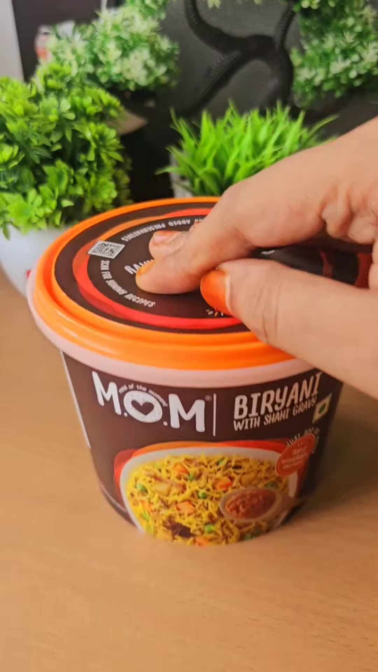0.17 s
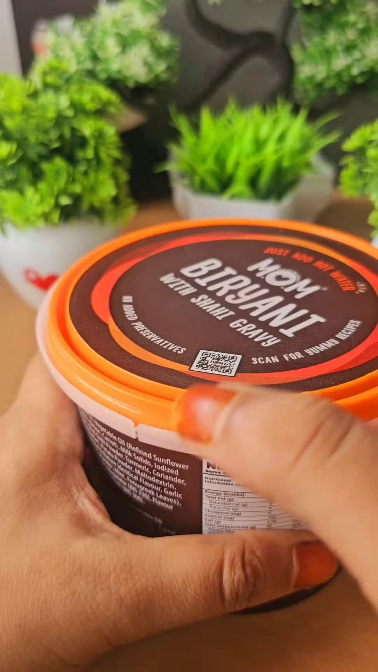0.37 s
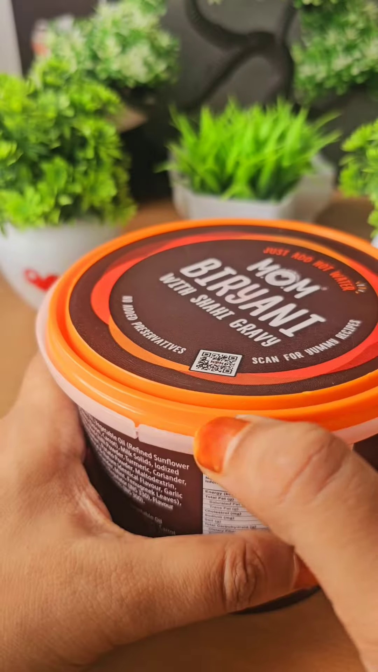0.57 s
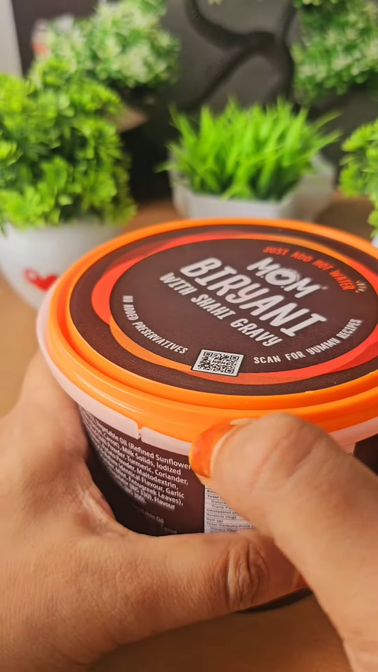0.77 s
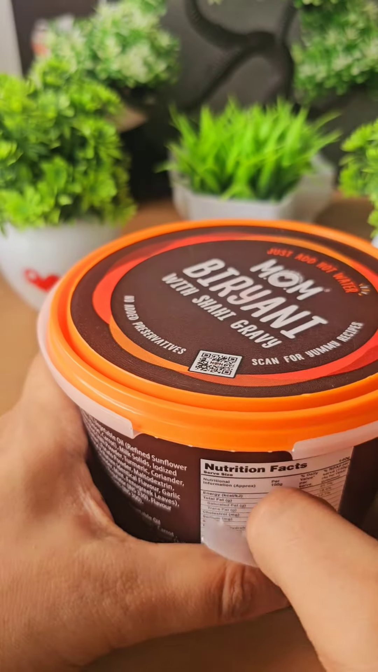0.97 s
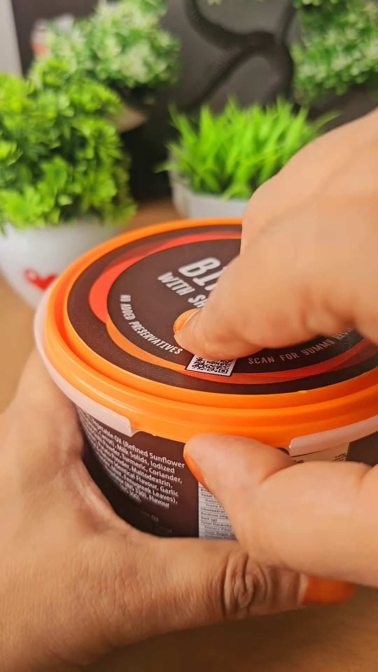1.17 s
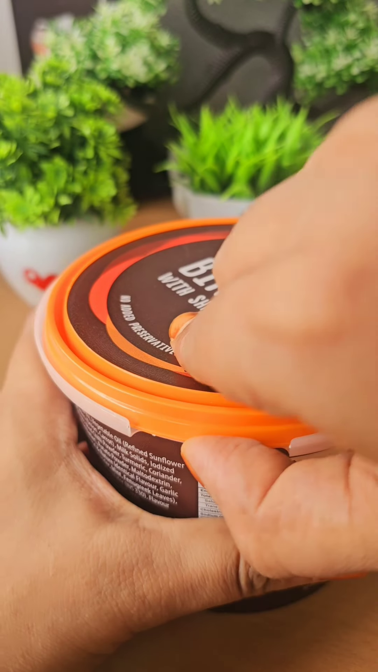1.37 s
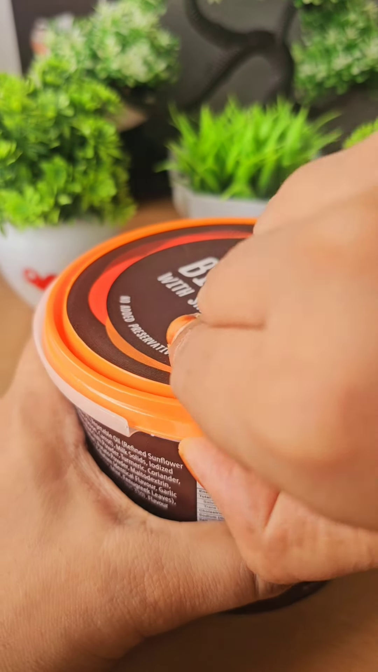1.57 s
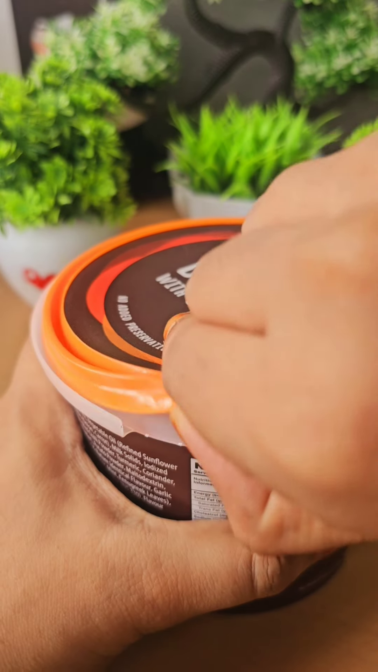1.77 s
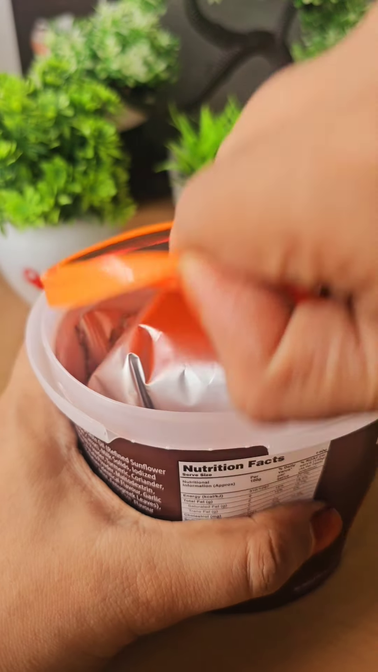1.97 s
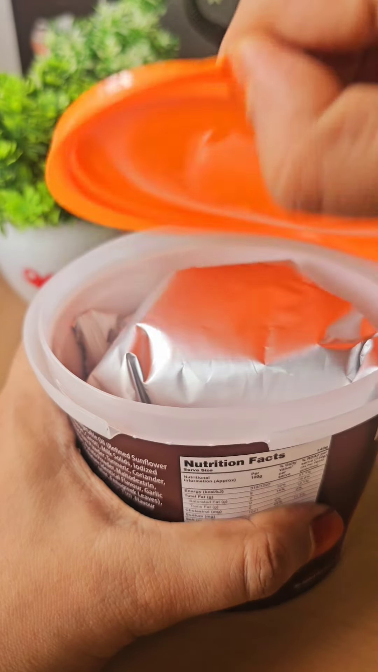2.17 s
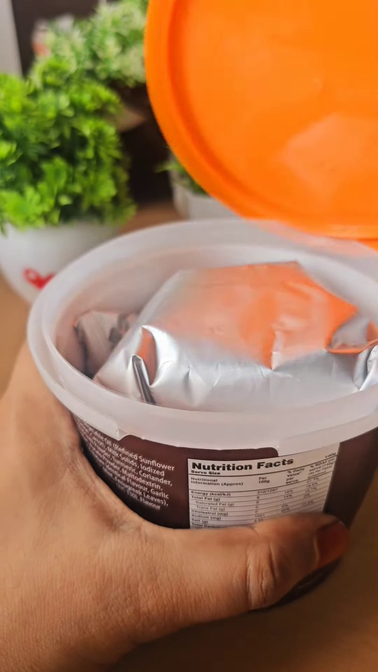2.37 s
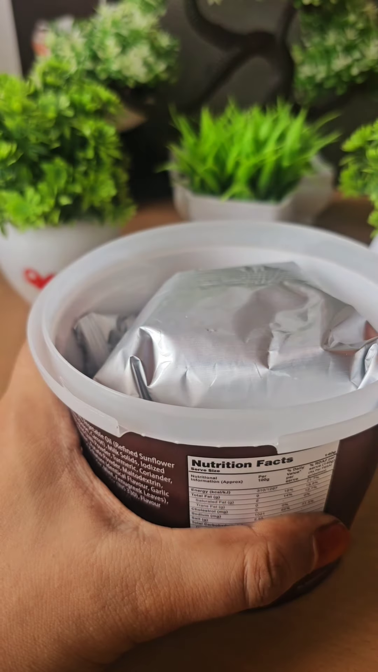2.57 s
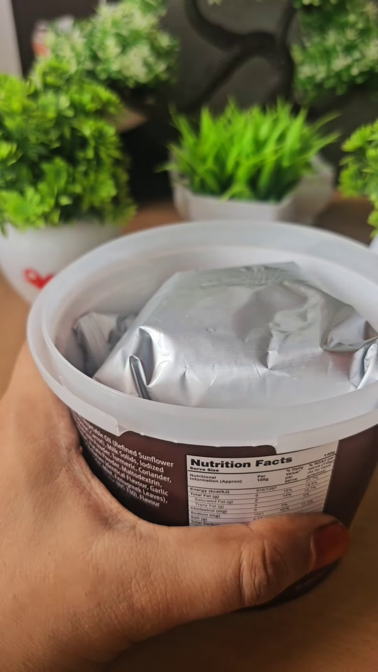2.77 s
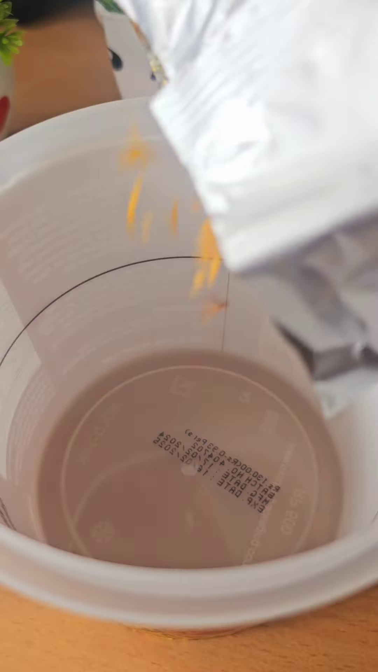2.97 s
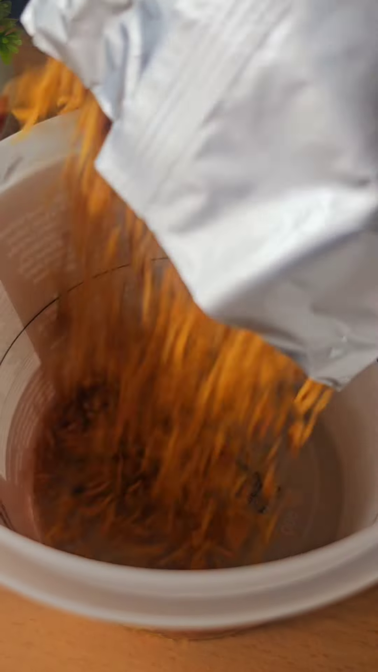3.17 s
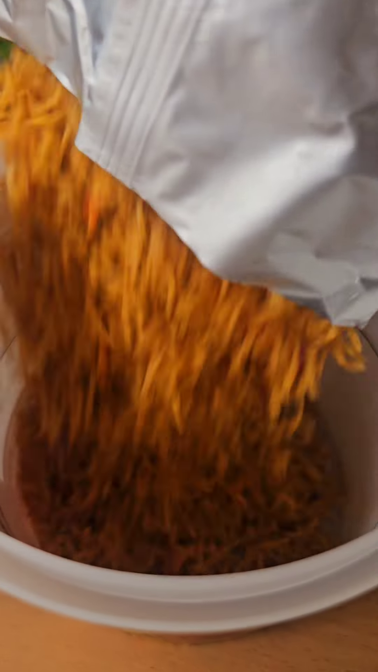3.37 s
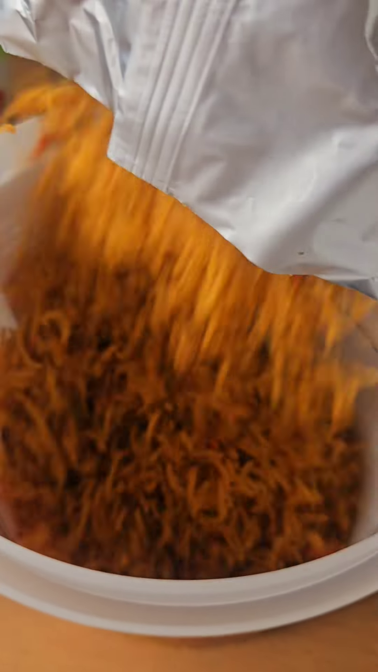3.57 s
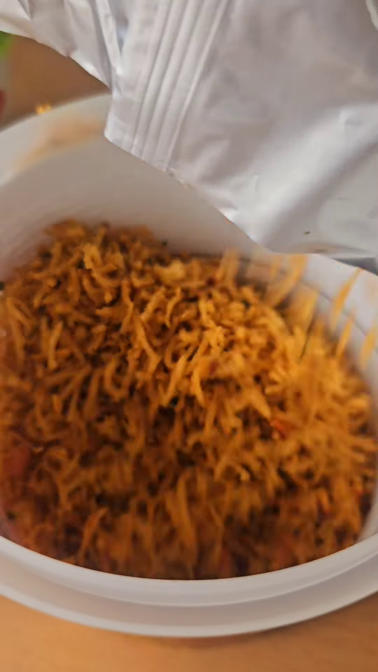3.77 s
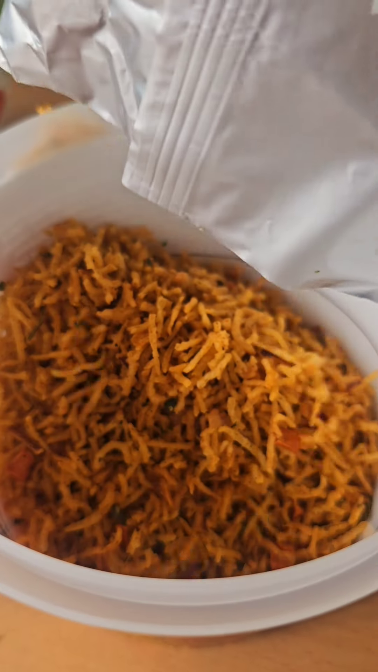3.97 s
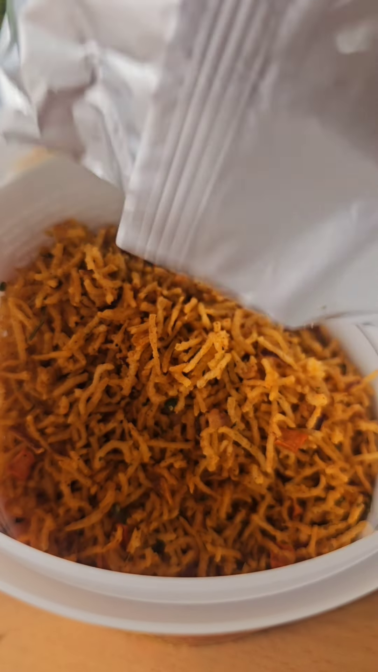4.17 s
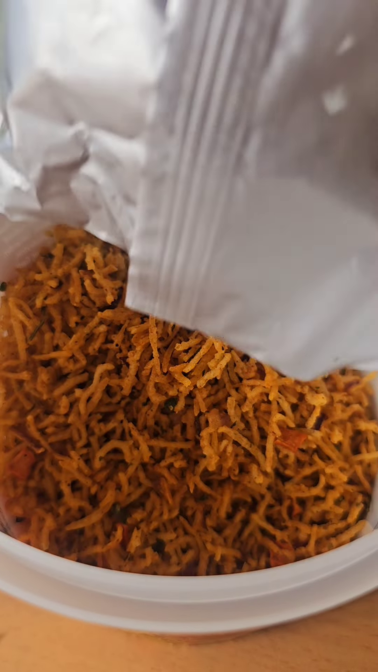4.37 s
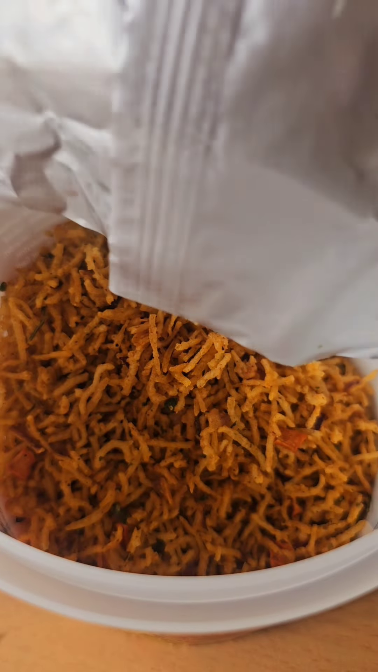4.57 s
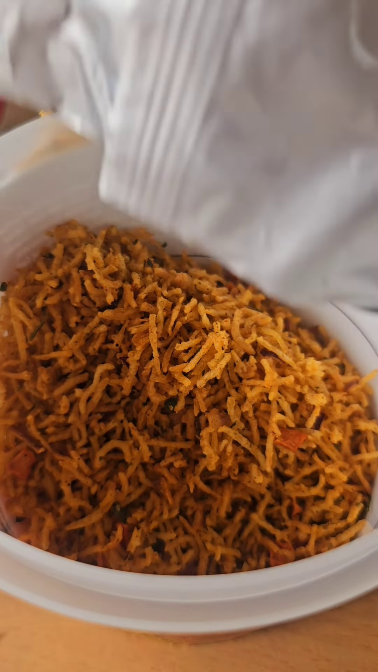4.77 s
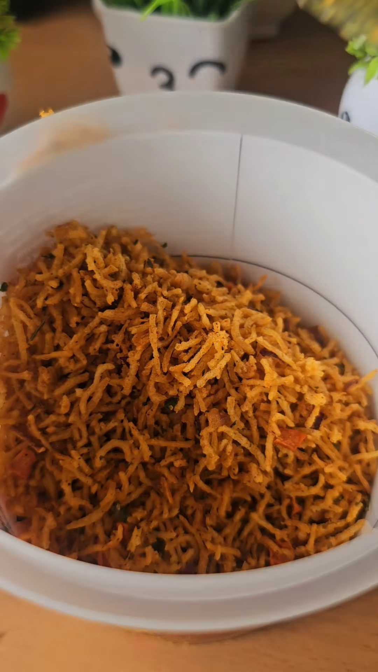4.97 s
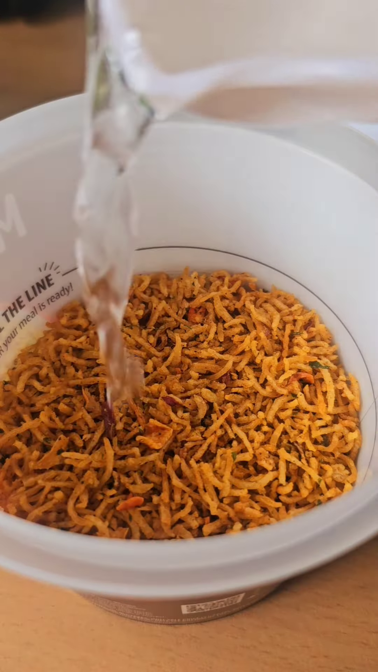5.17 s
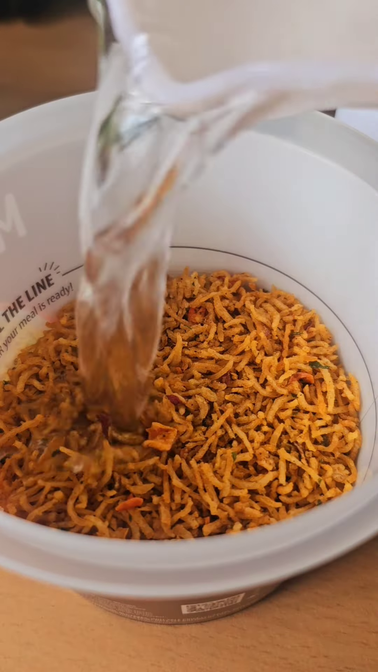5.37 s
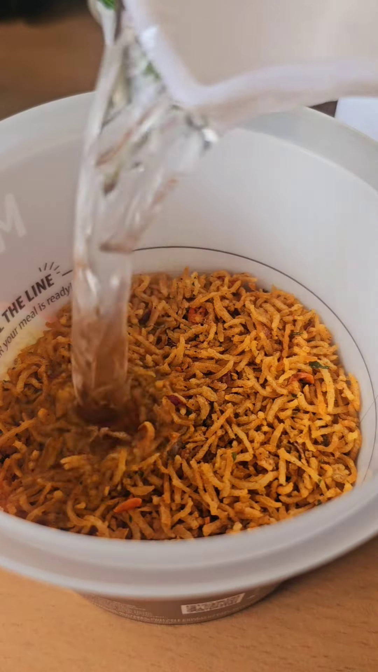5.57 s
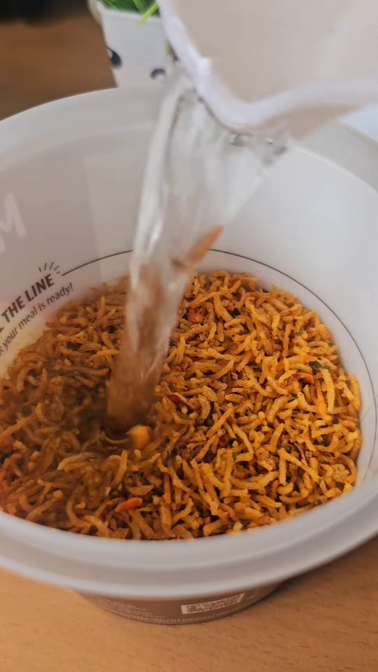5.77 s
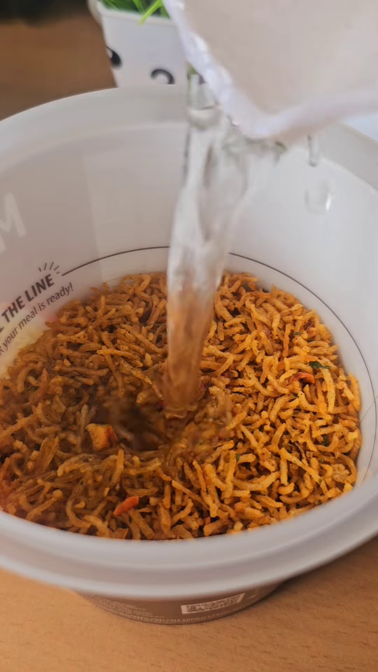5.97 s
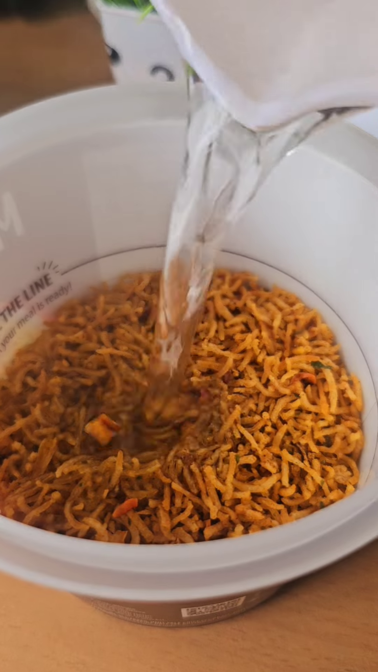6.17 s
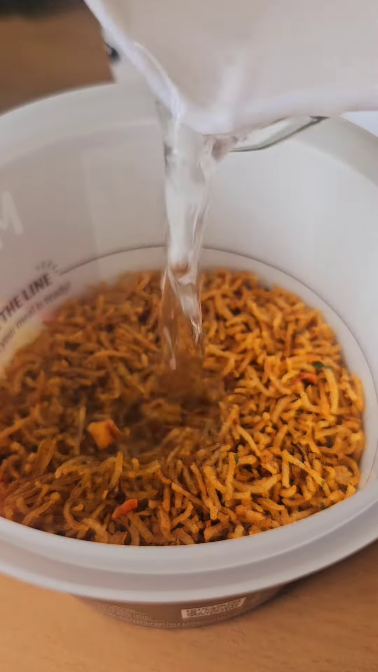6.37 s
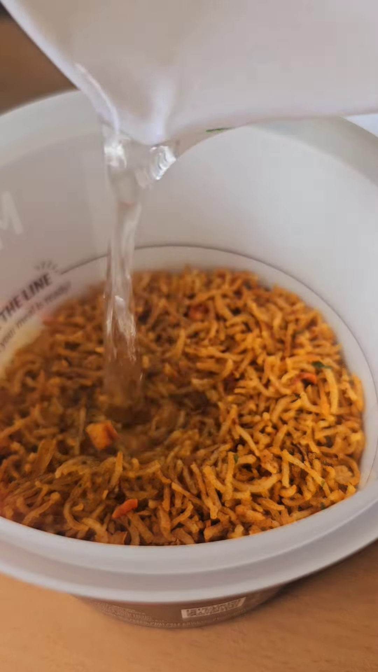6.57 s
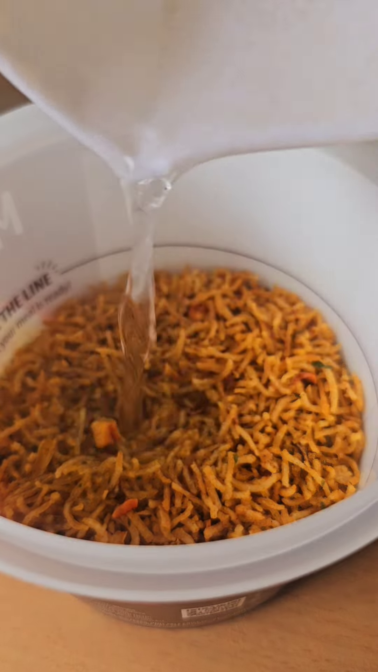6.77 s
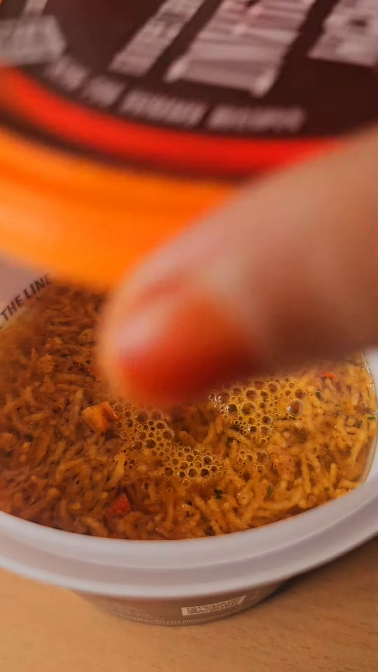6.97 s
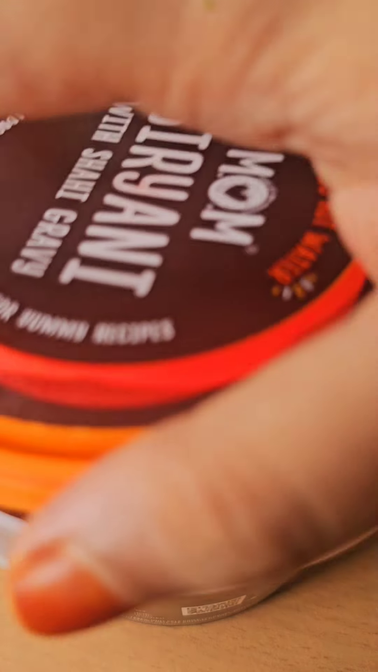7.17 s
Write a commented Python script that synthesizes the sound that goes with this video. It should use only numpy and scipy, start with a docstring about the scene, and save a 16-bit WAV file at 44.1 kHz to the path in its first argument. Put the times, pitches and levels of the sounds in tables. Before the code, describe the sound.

A small, slightly echoing room with low rumble and a distant machine drone, recorded close in stereo. From 0 s a faint rub of fingers on plastic, with tiny ticks until 0.75. At 0.8 a sharp, very loud double snap of a plastic tab, with a low table thump. Soft taps from 1.3, a duller knock at 1.75, a squeaky scrape and click around 1.9-2, then a strong hollow lid pop at 2.35. Near quiet until 2.95, when dry rice starts; hard ticks at 3.02 lead into a bright, dense rush peaking at 3.1-3.2, thinning through 3.7 and ending in stray ticks by 3.95. Foil rustle and a cluster of light knocks at 4.1-4.35. A barely audible high bird whistle at 4.55-5. From 5.15 to 6.9, quiet fine crackle with crisp pops and small bubbles, brighter and busier after 6.25. A light plastic touch at 7.2.

```python
"""Small room, plastic cup on a table: its tab snaps off and the lid pops free, dry rice rushes from a foil
pouch into it, hot water crackles into the rice, the lid touches down. A far bird whistles once over rumble.
Knocks drive cup resonances; rubbing, rice and water are coloured grain noise, with separate rice ticks and
pops; table booms are swelling sines; rumble is filtered noise. Decaying noise gives the echo."""
import sys
import numpy as np
from scipy import signal
from scipy.fft import rfft, irfft
from scipy.io import wavfile

SR = 44100
rng = np.random.default_rng(int(sys.argv[2]) if len(sys.argv) > 2 else 0)


def transcribe(signal):
    """Save signal, clipped to [-1, 1], as a 16-bit WAV file at the path in sys.argv[1]."""
    frames = np.atleast_2d(signal).T
    limited = np.clip(frames, -1, 1)
    pcm = np.round(limited * 32767).astype(np.int16)
    wavfile.write(sys.argv[1], SR, pcm)


N = 318402
TIME = np.arange(N) / SR
EDGES_HZ = 22 * 2 ** np.arange(0, 9.8, .4)   # filter-bank edges

# room rumble before waver: t/s, low level/dB, low-middle level/dB
RUMBLE = [(0.0, -54.5, -62), (0.8, -53.5, -61), (1.25, -60, -66), (1.9, -58.5, -55), (2.85, -59, -64.5),
          (3.1, -60, -59.5), (3.5, -48.5, -58), (3.85, -60, -63.5), (4.16, -54.5, -59.5), (4.85, -59, -64),
          (5.1, -54, -55.5), (6.75, -52.5, -56), (6.92, -49, -54.5), (7.22, -47.5, -55.5)]
# room spectra, earlier and later: f/Hz, relative density/dB
ROOM_EARLY = [(13, -32), (22, -13.5), (128, -5.5), (328, -12.5), (376, -28), (585, -21), (672, -32.5),
              (730, -22), (935, -40), (1380, -33), (3230, -42), (5310, -49), (5930, -35.5), (6810, -52.5),
              (16000, -51)]
ROOM_LATE = [(13, -54), (22, -77), (49, 8), (70, -2), (90, -6.5), (125, 3.5), (156, -19), (189, -9),
             (444, -16.5), (554, -35), (690, -36), (1540, -45), (1860, -52), (3150, -54), (16000, -66.5)]
# far machinery drone, earlier and later: f/Hz, width/Hz, level re low rumble/dB
DRONE_EARLY = [(61.5, 4.2, -8.5), (102.43, 3, -1.5), (194, 9.8, -17), (288.6, 15, -15)]
DRONE_LATE = [(54.8, 2.6, -7.5), (129.4, 2.7, 0.5), (222, 2.3, -14), (255, 8, -8.5), (331.4, 3.7, -12.5)]
# left-right correlation of the room: f/Hz, correlation/1
ROOM_CORRELATION = [(60, 0.96), (180, 0.87), (550, 0.7), (1650, 0.06), (4970, 0.02), (15000, 0.02)]
# left-right correlation of a wide near source: f/Hz, correlation/1
NEAR_CORRELATION = [(100, 0.61), (600, 0.8), (1500, 0.15), (3000, 0.18), (6000, 0.033), (15000, 0.13)]
# left-right tilt at full share, before the common offset: f/Hz, level difference/dB
TILT = [(60, 3.5), (130, 7.5), (290, 4), (640, -3.5), (1410, 10), (3100, 10), (6820, 8.5), (15000, 12)]
# source placement: t/s, left lag/samples, tilt share/1, echo level/dB
PLACEMENT = [(0, 4, 0.14, -3.5), (2.945, 5, 0.56, -14), (2.95, -17.5, 0.7, -10), (7.22, -15.5, 0.96, -9.5)]
# brief level dips: t/s, silent length/s
DIPS = [(0.314, 0.0058), (1.17, 0.0024), (1.175, 0.0059), (2.947, 0.0058), (6.891, 0.0022)]
# late table booms under a heavy jerk: t/s, f/Hz, level before swell and decay/dB, swell/ms, t60/s
BOOMS = [(0.814, 82, -16.5, 19, 0.22), (1.744, 89.1, -36, 35, 0.55), (2.335, 81.8, -22, 25, 0.17),
         (4.127, 97.6, -26, 15, 0.13)]
# strokes of hands, lid and pouch: t/s, held/s, level/dB, treble level/dB
RUB = [(0.0, 0.13, -50, -56.5), (0.385, 0.039, -65.5, -78), (0.5, 0.054, -69.5, -77),
       (1.198, 0.01, -65.5, -68), (1.32, 0.0078, -69, -79), (1.405, 0.0069, -87, -91),
       (1.52, 0.013, -69, -72.5), (1.6, 0.093, -74, -78.5), (1.765, .02, -54.5, -58),
       (1.909, 0.044, -52, -62), (2.05, 0.12, -65.5, -75.5), (2.905, .04, -62, -87),
       (3.929, 0.0089, -76, -61), (4.124, 0.08, -53.5, -62), (4.338, 0.013, -60, -58),
       (4.45, .25, -79, -80), (4.794, 0.0037, -68.5, -82), (4.9, .1, -81.5, -82.5)]
# rubbing spectrum: f/Hz, relative density/dB
RUB_COLOUR = [(150, -42.5), (250, -2.5), (287, -4.5), (460, 0.5), (528, -13), (607, -3.5), (971, -10.5),
              (1330, -2.5), (2570, -18.5), (3520, -14.5), (4410, -20.5), (16000, -32.5)]
# soaking crackle: t/s, level/dB
WATER = [(5.149, -73.5), (5.452, -73), (5.73, -66.5), (6.3, -69.5), (6.45, -64.5), (6.73, -73),
         (6.881, -70.5)]
# crackle spectrum: f/Hz, relative density/dB
WATER_COLOUR = [(710, -30.5), (1200, 1), (1790, -23.5), (2270, -6.5), (2590, -11), (4750, -10), (7820, -8),
                (8820, 2.5), (16000, -2.5)]
# louder pops and bubbles: t/s, ring onset level/dB, f/Hz
POPS = [(5.24, -55.5, 6260), (5.329, -49.5, 11400), (5.387, -34.5, 6120), (5.617, -45.5, 2900),
        (5.849, -38, 6630), (5.921, -45, 4100), (5.981, -48, 1326), (6.07, -44.5, 14100),
        (6.232, -43, 6460), (6.254, -51, 1290), (6.332, -31, 8920), (6.376, -48, 1240),
        (6.402, -36.5, 4450), (6.421, -42, 2320), (6.422, -46, 1084), (6.499, -39.5, 4945),
        (6.521, -54, 1310), (6.655, -49, 13400), (6.817, -40, 13400)]
# rice flow before clumping: t/s, level/dB
RICE = [(2.95, -50.5), (2.966, -37.5), (3.02, -43.5), (3.035, -32), (3.124, -21), (3.2, -24.5),
        (3.264, -30), (3.522, -30.5), (3.646, -34), (3.706, -32.5), (3.8, -44.5), (3.88, -58), (3.96, -72)]
# rice spectrum: f/Hz, relative density/dB
RICE_COLOUR = [(88, -45), (150, -27.5), (431, -14), (514, -2.5), (702, -4), (805, -1.5), (998, -8.5),
               (1500, -2), (1870, -4.5), (5460, -1.5), (6020, -3.5), (11700, -15), (16000, -14.5)]
# air and wall resonances of the open cup: f/Hz, width/Hz, level re its part/dB
HOLLOWS = [(546, 220, -12.5), (800.5, 55, -7), (1440, 98, -6), (2030, 190, -16), (4130, 300, -13),
           (5400, 220, -7), (11400, 290, -9)]
# single grains that stand out: t/s, level/dB
GRAINS = [(2.952, -38.5), (2.961, -53), (2.982, -38), (3.022, -15), (3.039, -17.5), (3.058, -30),
          (3.077, -26), (3.677, -24), (3.698, -26), (3.731, -32), (3.775, -49), (3.786, -29),
          (3.821, -23.5), (3.844, -41), (3.86, -35), (3.891, -38.5), (3.935, -42)]
# grain blow on bare cup and on heap: thump, body, wall, crack level re the grain/dB
GRAIN_BARE_DB = [-36.5, -17, -3.5, 4.1]
GRAIN_HEAP_DB = [-39, -25, -12, -1.7]
# snaps, pops, taps: t/s, thump/dB, body/dB, wall/dB, crack/dB, left-right/dB, contact decay/ms
KNOCKS = [(0.32, -47.5, -56.5, -57, -61, 4, 0.72), (0.402, -53.5, -69, -52.5, -61, 11, 4.7),
          (0.715, -55.5, -59, -64, -57, 0, 4), (0.734, -59.5, -70.5, -80, -60, 6, 3),
          (0.804, -45, -48, -3, -30, -8, 0.67), (0.807, -44, -48.5, 0.5, -31, 3, 0.84),
          (0.813, -24, -33.5, -9, -14.5, 2.5, 1.23), (1.313, -49, -62.5, -66, -54.5, 0, 1.7),
          (1.329, -52, -50, -69, -61, -2, 1.6), (1.404, -46, -50.5, -48.5, -91, -2.5, 1.1),
          (1.434, -53, -41, -79, -85, -2, 1.5), (1.682, -45, -53, -49, -59, -2, 1.5),
          (1.742, -33.5, -31.5, -28, -54, -6, 1.5), (1.76, -32.5, -47, -69, -51.5, -1, 1.4),
          (1.881, -40, -41.5, -77, -62.5, -2.5, 2.5), (1.955, -37, -28.5, -27, -26.5, 2, 2.04),
          (2.336, -20.5, -14.5, -4, -11.5, -2, 2.14), (3.906, -54, -36.5, -33, -39, 3, 1.9),
          (4.037, -58, -35, -35, -86, 2, 1.9), (4.119, -38.5, -42, -28.5, -61, 1, 1.9),
          (4.128, -38, -30, -29, -50, 0, 4.5), (4.15, -41, -30, -36, -58, 0.5, 2.1),
          (4.163, -47, -37, -49, -54, -2, 1.7), (4.173, -50, -49, -38, -50, 13, 1.5),
          (4.179, -69, -39, -33, -43, 8, 2.6), (4.19, -65, -43, -35, -47, -2.5, 2.5),
          (4.204, -51.5, -39, -38, -41, 7, 4.6), (4.227, -63, -43, -46, -48, 6, 3.5),
          (4.335, -48, -40.5, -44.5, -40, 1, 6), (4.521, -50, -70, -51.5, -63.5, 0, 1.5),
          (4.888, -54, -67, -62, -80, 1, 1.5), (4.797, -55.5, -42, -54.5, -81, 8.5, 1.47),
          (7.201, -52.5, -37, -34.5, -48.5, -2, 2)]
# where the four knock levels apply: f/Hz
KNOCK_LEVEL_HZ = [100, 600, 2400, 9000]
# cup and lid modes: f/Hz, mean level/dB, t60/s
CUP = [(66, -3.5, 0.15), (94.5, 2, 0.072), (135, -3, 0.096), (200, -2, 0.032), (294, -6, 0.11),
       (466, 5, 0.023), (660, 4, 0.018), (840, 1, 0.024), (1306, 4.5, 0.016), (1750, 4, 0.0046),
       (2197, -3, 0.0078), (2900, -5, 0.016), (3600, 2.5, 0.0054), (4400, 0.5, 0.0096), (5780, -6.5, 0.013)]
# toneless part of a knock: lower f/Hz, upper f/Hz, level/dB, extra level in the echo feed/dB
CRACKS = [(700, 1500, 11.5, 2.5), (1690, 6400, 14.5, 5.5), (4488, 18000, 15.5, -7.5),
          (9150, 18000, 18.5, 10)]

LATE_ROOM_S, RUMBLE_WAVER_DB = 5.01, 1.5
HISS_DB = [-67, -61.5]   # earlier, later room air before panning
ROOM_T60_S, WALL_CUT_HZ, OUTPUT_CUT_HZ = 0.32, 5200, 16400
WHISTLE_S, WHISTLE_TOP_S, WHISTLE_HZ, WHISTLE_SAG_HZ_PER_S2 = [4.55, 5.0], 4.77, 6100, 8500
WHISTLE_START_DB, WHISTLE_FADE_DB_PER_S = -76, 28
RUB_RISE_DB_PER_S, RUB_FALL_DB_PER_S = 598.5, 399.5
SQUEAK_HZ, SQUEAK_WIDTH_HZ, SQUEAK_DB = 3100, 500, -2.5
SQUEAK_BUILDS_S = 0.071   # shorter strokes excite it only in part
CRACKLES_PER_S = 690
WATER_TREBLE_DB, BRIGHTENING_S = [0.1, 5], [6.25, 6.4]   # crackle treble rises between these times
POP_CYCLES, BUBBLE_CYCLES, BUBBLE_BELOW_HZ = 2.6, 6.3, 1700   # cycles per e-fold of decay
SMALL_POPS, SMALL_POP_MEAN_DB, SMALL_POP_HZ = 16, -62, [1226, 5900]
FULL_FLOW_GRAINS_PER_S, SPARSE_BELOW_DB, RICE_TREBLE_DB = 1800, -33, -4   # weaker flow has fewer grains
HOLLOW_DB, BURIED_S = [-3.5, -18], [3.64, 3.753]   # low part before and after the heap covers the wall
HEAP_DB, HEAP_S = [-32.5, -13], [3.15, 3.5]   # heap thud re flow, before the burying fade
GRAIN_SCATTER_DB, GRAIN_CONTACT_MS = 4, 1.34   # left-right spread; contact decay
MODE_SCATTER_DB = 1.5   # uneven sharing of a blow among the modes


def from_db(db):
    """Decibels to gain."""
    return 10 ** (np.asarray(db) / 20)


def in_time(rows, outside=None):
    """Table columns interpolated to every sample."""
    s, *columns = np.transpose(rows)
    return [np.interp(TIME, s, column, outside, outside) for column in columns]


def at_hz(points, hz):
    """Spectrum interpolated on a log-frequency axis."""
    table_hz, values = np.array(points).T
    return np.interp(np.log(hz), np.log(table_hz), values)


def bandpass(x, low_hz, high_hz, order=2):
    """Butterworth band-pass."""
    return signal.sosfilt(signal.butter(order, [low_hz, high_hz], "band", fs=SR, output="sos"), x)


def ring(force, hz, t60_s):
    """Two-pole resonator: a unit click starts a decaying sine of height 1."""
    r, w = from_db(-60 / (t60_s * SR)), 2 * np.pi * hz / SR
    return signal.lfilter([0, np.sin(w)], [1, -2 * r * np.cos(w), r * r], force + 1e-18)


def ring_width(force, hz, width_hz):
    """Resonator set by bandwidth, whose inverse sets the decay time."""
    return ring(force, hz, np.log(1000) / (np.pi * width_hz))


def drift(rate_hz):
    """Slow random curve of standard deviation 1: twice low-passed noise."""
    r = np.exp(-2 * np.pi * rate_hz / SR)
    slow = signal.lfilter([1], [1, -2 * r, r * r], rng.standard_normal(N))
    return slow / np.std(slow)


def coloured(source, spectrum, correlation, low_hz=1900, high_hz=7500):
    """Filter bank shapes white stereo sources into lows, middle and highs, each nominally rms 1."""
    parts, power = np.zeros((3, 2, N)), np.full(3, 1e-20)
    for k, (low, high) in enumerate(zip(EDGES_HZ, EDGES_HZ[1:])):
        hz = np.sqrt(low * high)
        if spectrum[0][0] < hz < spectrum[-1][0]:
            mid, side = bandpass(source[k % 2], low, high)   # adjacent bands use independent sources
            c = np.clip(at_hz(correlation, hz), -1, 1)
            part = int(hz >= low_hz) + int(hz > high_hz)
            gain = from_db(at_hz(spectrum, hz))
            stereo = np.sqrt(.5 + c / 2) * mid + np.sqrt(.5 - c / 2) * side * [[1], [-1]]
            parts[part] += gain * stereo
            power[part] += gain ** 2 * (high - low) * 2 / SR
    return parts / np.sqrt(power)[:, None, None]


def grains(per_s, spread_db, hiss):
    """Random clicks of uneven size mixed with a power share of hiss; rms near 1 at constant rate."""
    shape = (2, 2, N)
    sizes = from_db(spread_db * np.minimum(rng.exponential(1, shape), 5))
    sizes *= np.sign(rng.random(shape) - .5)
    clicks = sizes * (rng.random(shape) < per_s / SR)
    clicks /= np.sqrt(np.mean(sizes ** 2) * per_s / SR)
    return np.sqrt(1 - hiss) * clicks + np.sqrt(hiss) * rng.standard_normal(shape)


def room_tone():
    """Wavering rumble, resonant drone and faint air noise; the colour changes once."""
    level_db, middle_db = (db + RUMBLE_WAVER_DB * drift(3) for db in in_time(RUMBLE))
    white, late, out = rng.standard_normal((2, 2, N)), TIME > LATE_ROOM_S, 0
    spans = zip((~late, late), (ROOM_EARLY, ROOM_LATE), (DRONE_EARLY, DRONE_LATE), HISS_DB)
    for on, spectrum, drone, hiss_db in spans:
        low, middle, air = coloured(white, spectrum, ROOM_CORRELATION, low_hz=165, high_hz=450)
        for hz, width_hz, drone_db in drone:
            lump = ring_width(white[0, 0], hz, width_hz)
            low = low + from_db(drone_db) * lump / np.std(lump)
        out = out + on * (from_db(level_db) * low + from_db(middle_db) * middle + from_db(hiss_db) * air)
    return out


def room(x):
    """Dense echo: convolution with dying noise, independent per channel and dulled by the walls."""
    after = np.arange(SR // 2) / SR
    echo = rng.standard_normal((2, len(after))) * from_db(-60 * after / ROOM_T60_S)
    echo *= np.minimum(after / 0.00043, 1)
    echo = bandpass(echo, 250, WALL_CUT_HZ, order=1)
    return signal.fftconvolve(x, echo / np.sqrt(np.sum(echo ** 2) / 2), axes=1)[:, :N]


def stereo_placement(x, tilt_db):
    """Delay or advance the left channel; tilt the levels between channels by frequency."""
    lag, share, _ = in_time(PLACEMENT)
    hz = np.maximum(np.fft.rfftfreq(N, 1 / SR), 1)
    tilted = irfft(rfft(x) * from_db(np.outer([.5, -.5], at_hz(TILT, hz) + tilt_db)), N)
    left, right = (1 - share) * x + share * tilted
    return np.array([np.interp(np.arange(N) - np.round(lag), np.arange(N), left), right])


def bird():
    """Thin sine whistle on a parabolic pitch arc, fading and wavering in level."""
    hz = WHISTLE_HZ - WHISTLE_SAG_HZ_PER_S2 * np.clip(TIME - WHISTLE_TOP_S, -1, 1) ** 2
    start, end = WHISTLE_S
    on = np.clip(np.minimum(TIME - start, end - TIME) / 0.038, 0, 1)
    level_db = WHISTLE_START_DB - WHISTLE_FADE_DB_PER_S * np.clip(TIME - start, 0, 1) + 5.0 * drift(15)
    return on * from_db(level_db) * np.sin(2 * np.pi * np.cumsum(hz) / SR)


def booms():
    """Low table modes: sines that swell, then die."""
    out = 0
    for s, hz, level_db, swell_ms, t60_s in BOOMS:
        after = np.maximum(TIME - s, 0)
        swell = (1 - np.exp(-after * 1000 / swell_ms)) ** 2
        out = out + swell * from_db(level_db - 60 * after / t60_s) * np.sin(2 * np.pi * hz * after)
    return out


def rubbing():
    """Skin and foil dragged over plastic: fine uneven slips drive a squeak; strokes rise, hold, fade."""
    gain, treble, singing = 0, 0, 0
    for s, held_s, level_db, treble_db in RUB:
        rise_db, fall_db = RUB_RISE_DB_PER_S * (TIME - s), RUB_FALL_DB_PER_S * (s + held_s - TIME)
        edge_db = np.minimum(0, np.minimum(rise_db, fall_db))
        stroke = from_db(level_db + edge_db)
        gain = gain + stroke
        treble = treble + from_db(treble_db + edge_db)
        singing = singing + stroke * min(held_s / SQUEAK_BUILDS_S, 1)
    slips = grains(1600, 3.3, hiss=.6)
    low, middle, high = coloured(slips, RUB_COLOUR, NEAR_CORRELATION, low_hz=500, high_hz=4200)
    squeak = np.diff(ring_width(slips[0, 0], SQUEAK_HZ, SQUEAK_WIDTH_HZ), prepend=0)
    squeak *= from_db(SQUEAK_DB) / np.std(squeak)
    return gain * (0.66 * low + middle) + treble * high + singing * squeak


def water():
    """Air bursts from dry grains: fine crackle, louder pops and bubbles as damped cosines with clicks."""
    level_db, = in_time(WATER, outside=-140)
    start, end = WATER[0][0], WATER[-1][0]
    treble_db = np.interp(TIME, BRIGHTENING_S, WATER_TREBLE_DB) + 1.2 * drift(30)
    crackle = grains(CRACKLES_PER_S, 7.6, hiss=0.5)
    low, middle, treble = coloured(crackle, WATER_COLOUR, NEAR_CORRELATION)
    out = from_db(level_db) * (0.39 * low + middle + from_db(treble_db) * treble)
    after = np.arange(SR // 50) / SR
    tick = 0.64 * (after == 0)   # bursting film
    low_hz, high_hz = SMALL_POP_HZ
    small = [(start + a * (end - start), SMALL_POP_MEAN_DB + 8 * (b - .5),
              low_hz * (high_hz / low_hz) ** (c ** 3))
             for a, b, c in rng.random((SMALL_POPS, 3))]
    for s, pop_db, hz in list(POPS) + small:
        i = round(s * SR)
        cycles = BUBBLE_CYCLES if hz < BUBBLE_BELOW_HZ else POP_CYCLES
        pop = np.cos(2 * np.pi * hz * after) * np.exp(-after * hz / cycles) + tick
        out[:, i:i + len(after)] += from_db(pop_db) * pop
    return out


def rice():
    """Hard grains tick on wall and heap and ring the open cup; burying the wall damps the lows."""
    level_db, = in_time(RICE, outside=-140)
    per_s = FULL_FLOW_GRAINS_PER_S * from_db(np.clip(level_db - SPARSE_BELOW_DB, -20, 0))
    ticks = grains(per_s, 3.1, hiss=0.13)
    parts = coloured(ticks, RICE_COLOUR, NEAR_CORRELATION, low_hz=3000)
    for hz, width_hz, ring_db in HOLLOWS:
        tone = np.diff(ring_width(ticks[0, 0], hz, width_hz), prepend=0)
        parts[int(hz > 3000) + int(hz > 7500)] += from_db(ring_db) * tone / np.std(tone)
    low, middle, treble = parts
    thud = bandpass(ticks[1, 0], 170, 450)
    thud = from_db(np.interp(TIME, HEAP_S, HEAP_DB)) * thud / np.std(thud)
    burying = from_db(np.interp(TIME, BURIED_S, HOLLOW_DB) - HOLLOW_DB[0])
    body = burying * (from_db(HOLLOW_DB[0]) * low + thud)
    level_db = level_db + 1.6 * drift(31)   # stream clumps
    return from_db(level_db) * (body + middle + from_db(RICE_TREBLE_DB) * treble)


def knocks():
    """A contact is a click plus short rattle: it cracks and drives the cup modes; also feeds the echo."""
    ticks = []
    for s, db in GRAINS:
        blow_db = np.add(db, GRAIN_HEAP_DB if s > HEAP_S[1] else GRAIN_BARE_DB)
        ticks.append((s, *blow_db, rng.normal(0, GRAIN_SCATTER_DB), GRAIN_CONTACT_MS))
    rows = np.array(list(KNOCKS) + ticks)
    span, out = np.arange(SR // 60), np.zeros((2, N))
    draws = rng.standard_normal((len(rows), len(span) + len(CUP)))
    rattle = 0.53 * draws[:, :len(span)]
    rattle[:, 0] = 1
    rattle *= np.exp(-span / (np.maximum(rows[:, 6:], .05) * SR / 1000))
    rattle /= np.sqrt(np.sum(rattle ** 2, axis=1, keepdims=True))
    at = np.minimum(np.round(rows[:, :1] * SR).astype(int) + span, N - 1)

    def force(hz, level_db, shape=rattle):
        """All blows as felt at one frequency."""
        blow_db = [np.interp(np.log(hz), np.log(KNOCK_LEVEL_HZ), row[1:5]) for row in rows]
        train = np.full((2, N), 1e-18)
        for side in (0, 1):
            gain = from_db(blow_db + rows[:, 5] * (.5 - side) + level_db)
            np.add.at(train[side], at, gain[:, None] * shape)
        return train

    for k, (hz, level_db, t60_s) in enumerate(CUP):   # each blow lands elsewhere: new mode shares
        mode_db = level_db + MODE_SCATTER_DB * draws[:, -1 - k]
        out += ring(force(hz, mode_db), hz, t60_s) * (-1) ** k
    afar = signal.sosfilt(signal.butter(2, 1100, fs=SR, output="sos"), out)
    for k, (low, high, level_db, afar_db) in enumerate(CRACKS):   # alternating signs join bands evenly
        hz, sign = np.sqrt(low * high), (-1) ** k
        out += bandpass(force(hz, level_db), low, high) * sign
        afar += bandpass(force(hz, level_db + afar_db, span == 0), low, high) * sign   # bare clicks
    return out, afar


def scene():
    """Sum of room tone, bird, booms, placed near sources and their echo."""
    _, share, echo_db = in_time(PLACEMENT)
    streams = rubbing() + rice() + water()
    hits, hits_afar = knocks()
    near = stereo_placement(streams + hits, tilt_db=3.5)
    echo = room(from_db(echo_db) * (streams + hits_afar))
    air = room_tone() * from_db(np.outer([.5, -.5], share * 3.3))
    return near + echo + air + booms() + bird()


def record(dry):
    """Round the highest peaks, dip the level briefly to silence, low-pass the top."""
    gate = np.ones(N)
    for s, length_s in DIPS:
        gate *= np.clip((np.abs(TIME - s - length_s / 2) - length_s / 2) / 0.00052, 0, 1)
    rounded = dry / (1 + (dry / .72) ** 6) ** (1 / 6)
    return signal.sosfilt(signal.cheby2(14, 60, OUTPUT_CUT_HZ, fs=SR, output="sos"), rounded * gate)


dry = scene()
out = record(dry)
transcribe(out)
```